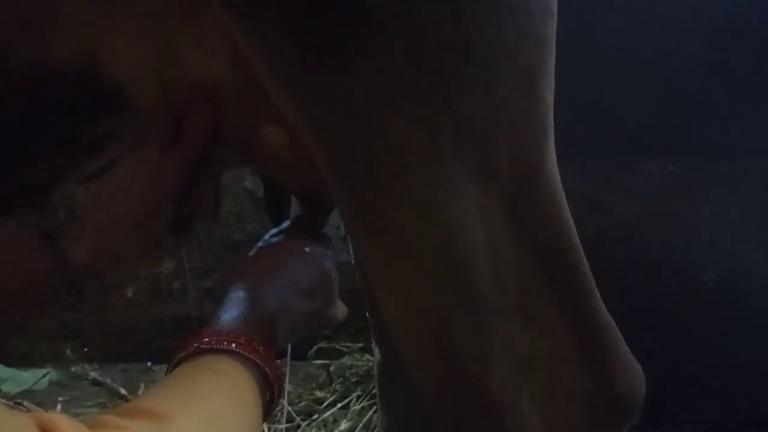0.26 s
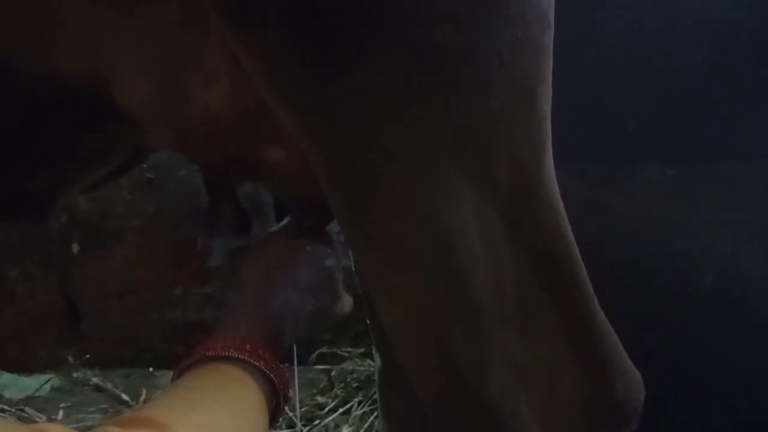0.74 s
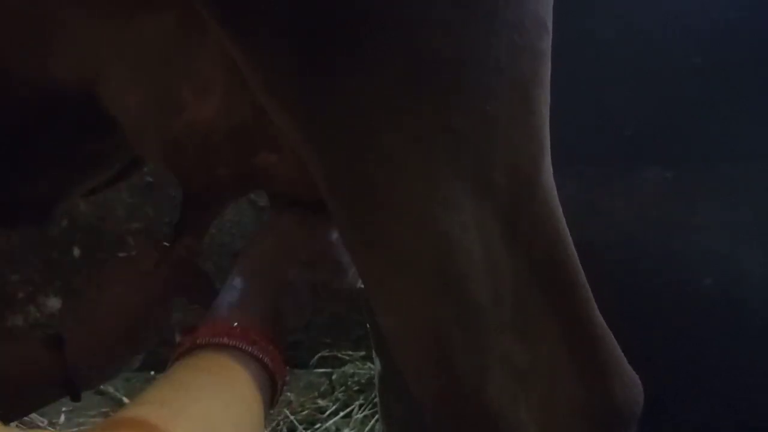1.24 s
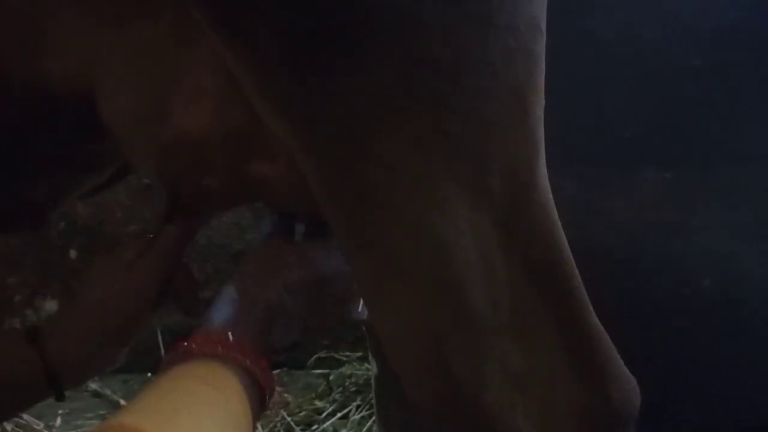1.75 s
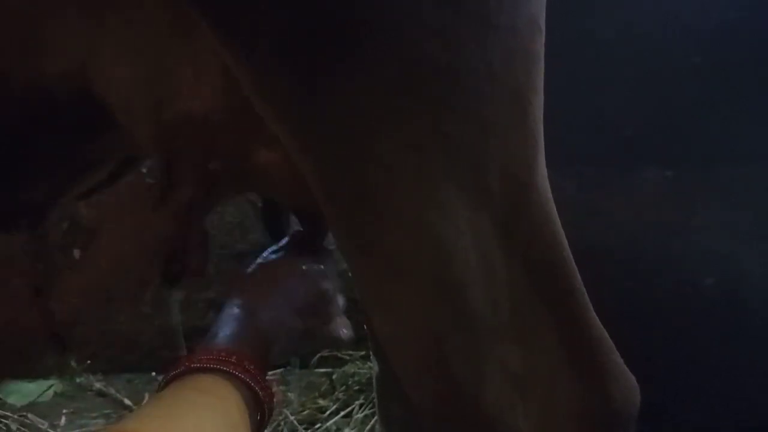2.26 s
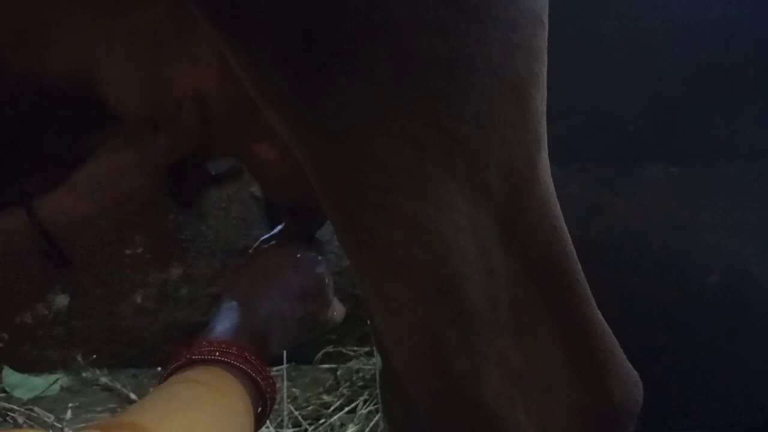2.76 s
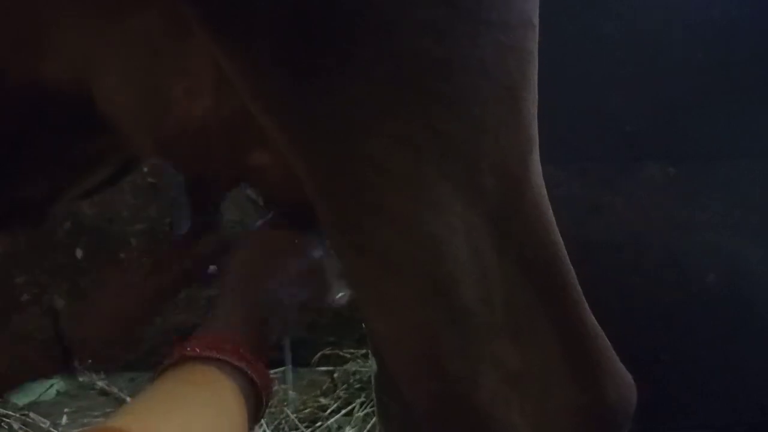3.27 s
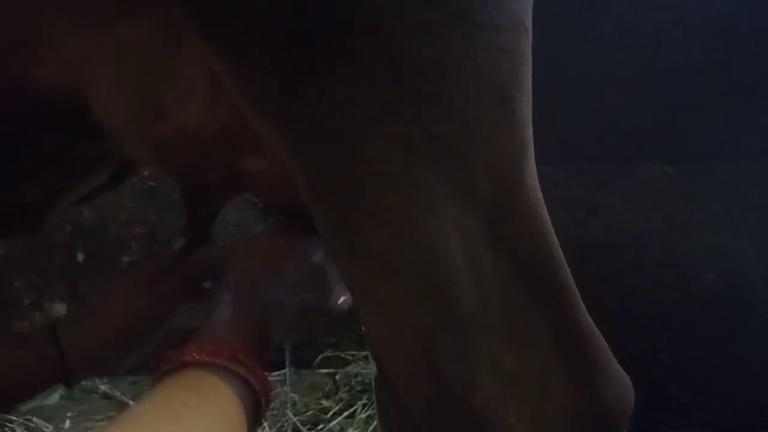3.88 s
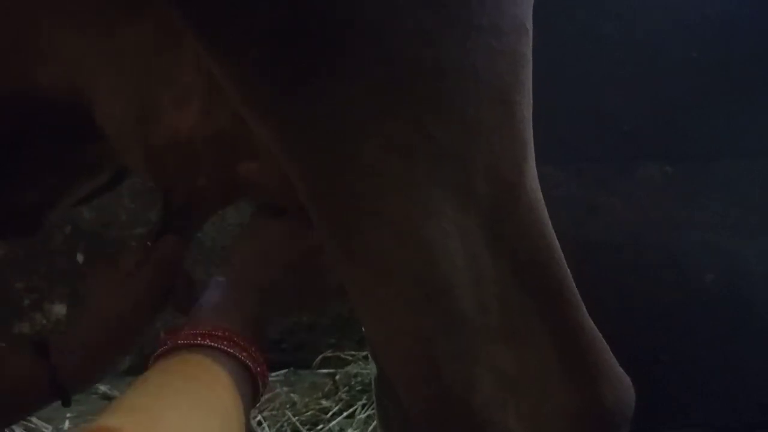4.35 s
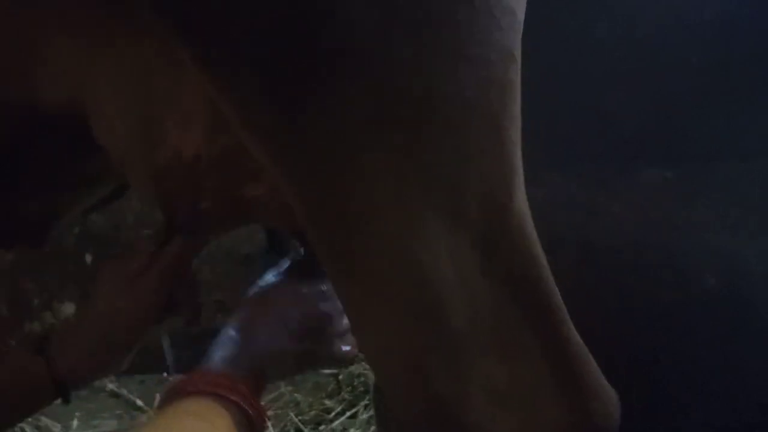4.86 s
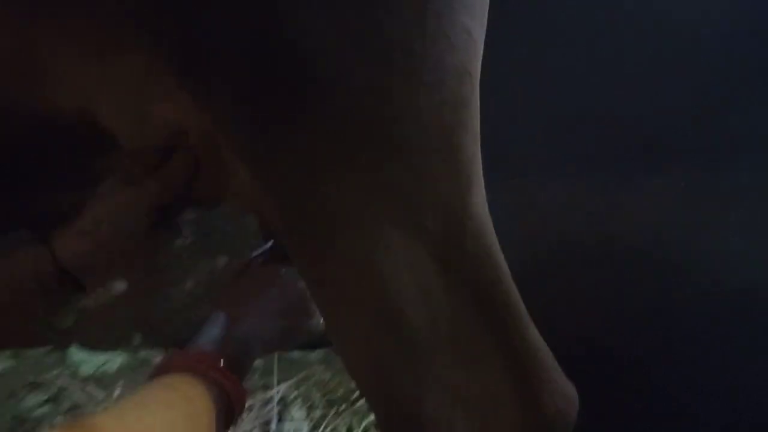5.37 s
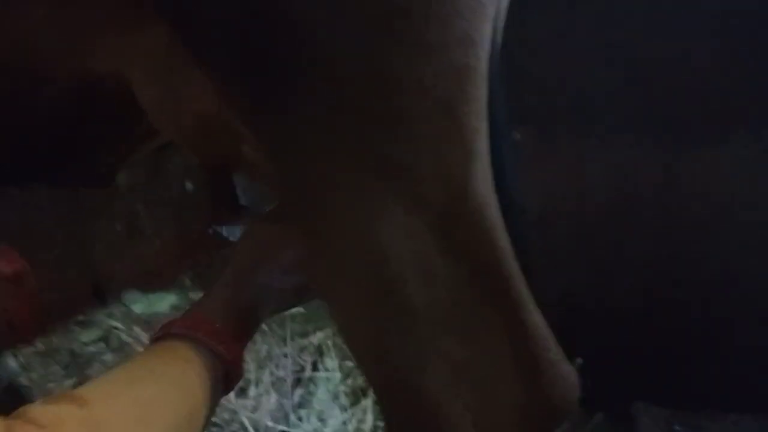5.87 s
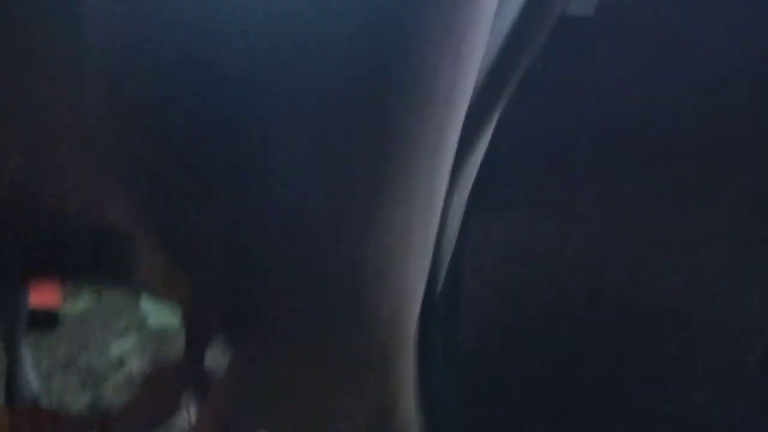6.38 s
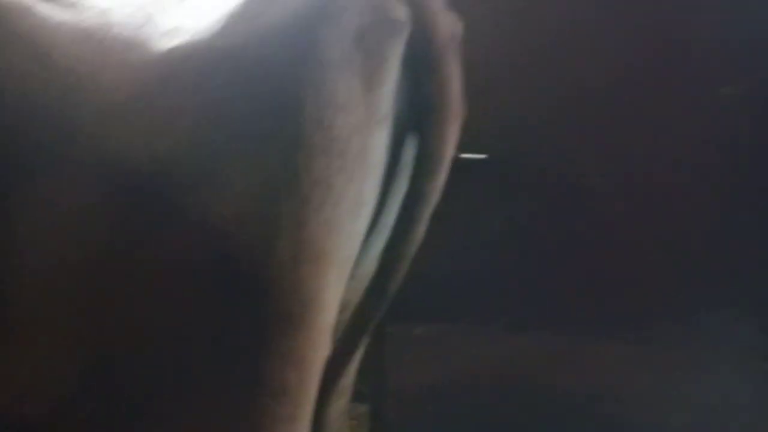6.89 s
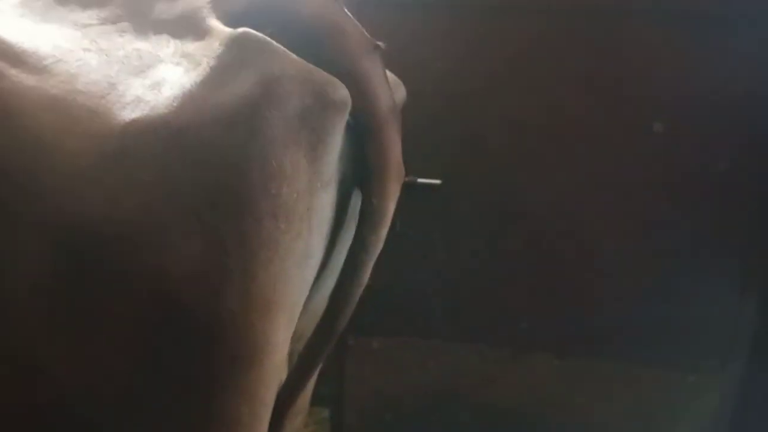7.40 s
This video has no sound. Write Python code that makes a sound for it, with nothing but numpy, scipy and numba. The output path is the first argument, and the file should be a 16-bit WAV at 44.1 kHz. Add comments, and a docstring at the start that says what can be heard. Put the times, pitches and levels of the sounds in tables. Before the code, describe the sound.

A cow is milked by hand, with rhythmic, fizzy squirts of milk ringing in a foamy metal pail in a quiet barn.

```python
"""Rhythmic, fizzy squirts ring in a metal pail: a cow milked by hand, strong and weak teat in turn.
Each jet drives bubbles into the foam, which ring the pail wall; brief notes sing as it hits the pail.
Spray and foam hiss and crackle on top, stray drops splat, and the air in the pail hums.
Underneath, a soft rumble comes and goes in a quiet barn. Heard close up, in mono."""
import sys
import numpy as np
from scipy import signal
from scipy.fft import rfft, irfft, next_fast_len
from scipy.io import wavfile
from scipy.ndimage import uniform_filter1d
from numba import njit

SR = 44100
rng = np.random.default_rng(int(sys.argv[2]) if len(sys.argv) > 2 else 0)


def materialize(psi):
    """Save the field psi as 16-bit PCM at rate SR to the path in sys.argv[1].

    A 1-D psi becomes a single channel; in a 2-D psi each row is a channel.
    """
    bounded = np.clip(np.atleast_2d(psi).T, -1, 1)
    quanta = np.round(bounded * 32767).astype(np.int16)
    wavfile.write(sys.argv[1], SR, quanta)


N = 336463

# Tone of the bubbles, by size: f/Hz, relative level/dB
BIG_BUBBLES = [(800, -2), (930, 0.5), (1050, 1), (1250, -2), (1500, 0), (1950, -37), (3300, -90)]
MIDDLE_BUBBLES = [(1200, -10), (1400, 0), (1600, -9.5), (1750, -14.5), (1950, -8.5), (2200, -25),
                  (3000, -80)]
SMALL_BUBBLES = [(1600, -14), (1950, 1), (2300, -1), (2800, -1), (3500, -1), (4600, 2), (6000, -7),
                 (9000, -80)]
TINY_BUBBLES = [(3600, -13), (4300, 0), (6400, 4), (8000, -2.5), (9500, -13), (12500, -17), (15000, -60)]
# Tone of the spray, the foam's fizz and its airy top: f/Hz, relative level/dB
SPRAY_EQ = [(300, -97), (2200, -5.5), (3800, -3.5), (5360, -5.5), (6460, -3.5), (7000, -8), (8200, -43),
            (11000, -39)]
FIZZ_EQ = [(1500, -71), (5000, -2.5), (7500, 0.5), (8100, -1.5), (9500, 2.5), (11500, -5), (13400, -11),
           (15500, -12)]
SHIMMER_EQ = [(9000, -70), (13600, -24), (14100, -12), (14650, 0), (15750, 0)]
# One squirt a row: t/s, attack/s, length/s, pressure sag/(dB/s), small bubbles/dB, their pitch/Hz,
# middle bubbles/dB, big bubbles/dB, their pitch/Hz, its slide/(octaves/s),
# spray/dB, fizz/dB, shimmer/dB, gurgle/dB, boom/dB
SQUIRTS = [(-0.078, 0.041, 0.12, -1.5, -30.5, 2620, -43, -35.5, 1004, 0.62, -36, -36.5, -34, -47.5, -40.5),
           (0.21, 0.11, 0.26, 15, -37.5, 2930, -46, -48.5, 1110, -0.18, -34, -37, -43, -47.5, -63),
           (0.506, 0.082, 0.2, 13.5, -28, 2540, -35.5, -36.5, 1130, -1.25, -30.5, -34.5, -35, -48, -43),
           (0.852, 0.078, 0.19, 14, -32.5, 2700, -39, -47.5, 1150, -0.72, -37.5, -39.5, -41, -51.5, -48.5),
           (1.153, 0.034, 0.19, -4.5, -33.5, 2930, -47.5, -38, 1144, -0.71, -35, -41, -35, -46.5, -43.5),
           (1.515, 0.07, 0.15, 19, -30.5, 2600, -38.5, -41, 1130, 0.49, -41, -38, -47, -48.5, -47.5),
           (1.798, 0.068, 0.24, 17.5, -25.5, 2730, -34, -33, 1226, -1.63, -33, -36.5, -33, -40, -38),
           (2.133, 0.1, 0.14, 13, -30.5, 2670, -37.5, -40, 1075, -1.2, -33.5, -36, -37, -51, -48),
           (2.443, 0.066, 0.18, 13.5, -27.5, 2900, -35.5, -35.5, 1160, -1.5, -33, -35, -33, -48, -44.5),
           (2.8, 0.037, 0.2, 23, -34.5, 2480, -39, -45.5, 1160, -0.029, -35.5, -42.5, -40, -45.5, -48),
           (3.102, 0.073, 0.22, 17.5, -25.5, 2750, -38, -31.5, 1175, -1.1, -33.5, -35, -38, -42, -40),
           (3.477, 0.046, 0.13, 23, -32.5, 2600, -40, -45.5, 1006, 1.1, -36, -44, -40, -50, -56),
           (3.728, 0.11, 0.2, 25.5, -24.5, 2440, -31.5, -34.5, 1040, -0.22, -30, -30, -33, -38.5, -41.5),
           (4.084, 0.093, 0.11, 15, -30.5, 2550, -36.5, -45, 1170, -1.1, -34.5, -36, -36, -49.5, -61),
           (4.352, 0.055, 0.22, 17.5, -26.5, 2810, -30, -37, 1080, 0.16, -33, -37, -37, -45, -44),
           (4.715, 0.055, 0.12, 9, -35.5, 2410, -38.5, -42, 1020, 1.6, -35, -39, -39, -49, -43.5),
           (4.999, 0.15, 0.21, 24.5, -25, 2560, -31.5, -34.5, 960, 2.1, -30.5, -29.5, -32, -38, -39),
           (5.317, 0.23, 0.17, 23.5, -27.5, 2580, -35.5, -39, 990, 1, -29.5, -27.5, -30, -43, -45),
           (5.647, 0.16, 0.23, 32.5, -21, 2320, -31, -32, 1130, -1.9, -29.5, -24.5, -34, -38.5, -39),
           (5.978, 0.16, 0.24, 34.5, -28, 2980, -35.5, -46.5, 910, 1.06, -32.5, -29, -39, -42.5, -47),
           (6.314, 0.081, 0.17, 23, -27.5, 2950, -33.5, -34.5, 1070, -0.45, -32, -34, -35, -43, -42),
           (6.651, 0.063, 0.19, 40, -32, 2700, -40, -46, 1090, -0.096, -35, -37, -45, -49, -53),
           (6.955, 0.04, 0.15, 3, -35, 2880, -39, -37.5, 960, 0.28, -36, -39.5, -38, -47, -40.5),
           (7.275, 0.074, 0.18, 14.5, -36, 2800, -44.5, -46.5, 1090, -0.11, -41.5, -44, -54, -54, -50),
           (7.576, 0.044, 0.15, 78, -28, 3030, -36, -33.5, 1290, -1.2, -36, -40, -49, -45, -41)]
def jet():
    """Each squirt stirs up bubbles of four sizes, spray and fizzing foam."""
    small_db, small_hz, middle_db, big_db, big_hz, big_slide = np.transpose(SQUIRTS)[4:10]
    spray_db, fizz_db, shimmer_db = np.transpose(SQUIRTS)[10:13]
    big = bubbles(BIG_BUBBLES, pitch_slide(big_hz, big_slide), count=11000, cycles=75, scatter_db=0,
                  glide=0.051, focus_db=6, focus_octaves=0.052, wall_db=1)
    middle = bubbles(MIDDLE_BUBBLES, np.full(N, 1640.), count=10000, cycles=36, scatter_db=-0.5,
                     glide=0.03, focus_db=4.5, focus_octaves=0.078, wall_db=-3)
    small = bubbles(SMALL_BUBBLES, pitch_slide(small_hz, octaves_per_s=0.17), count=32000, cycles=46,
                    scatter_db=-0.9, glide=0.049, focus_db=5.5, focus_octaves=0.55, wall_db=2.5)
    tiny = bubbles(TINY_BUBBLES, np.full(N, 6300.), count=9000, cycles=99, scatter_db=3,
                   glide=0.06, focus_db=1, focus_octaves=0.24, wall_db=-53)
    spray = crackle(SPRAY_EQ, pop_share=0.058, scatter_db=4.5, flicker_db=0.5, band_flicker_db=2.5)
    spray = unit(spray + undb(-9.5) * tiny)
    fizz = crackle(FIZZ_EQ, pop_share=0.19, scatter_db=2, flicker_db=1, band_flicker_db=2)
    shimmer = crackle(SHIMMER_EQ, pop_share=0.18, scatter_db=13, flicker_db=-1.5, band_flicker_db=1.5)
    body = (envelope(small_db, "small") * small + envelope(middle_db, "middle") * middle
            + envelope(big_db, "big") * big + envelope(spray_db, "spray") * spray)
    sizzle = undb(0.9 * wander(26))
    foam = envelope(fizz_db, "fizz") * fizz + envelope(shimmer_db, "shimmer") * shimmer
    return body + sizzle * foam


# Layer names, one for each row of LAYER_SHAPES
LAYERS = ["small", "middle", "big", "spray", "fizz", "shimmer", "gurgle", "boom"]
# How a layer rides a squirt: attack factor, sag factor, extra hold/s, release/(dB/s), floor/dB, sputter/dB
LAYER_SHAPES = [(1.84, 1.33, 0.011, 79, -53.5, 0.4), (1.22, 1.24, 0.0024, 62, -75, 1.2),
                (1.36, 0.28, 0.03, 73, -82, 0.79), (1.33, 1.03, -0.035, 21.3, -65, 0.29),
                (3.2, 1.35, -0.042, 39, -47.5, 0.12), (1.9, 0.66, -0.039, 21, -45.5, 0.6),
                (2.26, 0.8, 0.03, 45, -68, 0.87), (0.36, 0.0, 0.084, 200, -53.5, 2.5)]
def envelope(levels_db, layer):
    """A layer's sputtering gain: every squirt swells, sags with the pressure and fades to a floor."""
    attack_factor, sag_factor, hold_s, release, floor_db, sputter_db = LAYER_SHAPES[LAYERS.index(layer)]
    power = np.full(N, undb(floor_db) ** 2)
    for (start, attack_s, length, sag, *_), db in zip(SQUIRTS, levels_db):
        i = max(int(start * SR), 0)
        age = np.arange(i, min(i + SR, N)) / SR - start
        attack = np.clip(age / max(attack_s * attack_factor, .005), 0, 1)
        swell = np.sin(np.pi / 2 * attack) ** 0.94
        fall_db = sag_factor * sag * age + release * np.maximum(age - length - hold_s, 0)
        power[i:i + len(age)] += (swell * undb(db - fall_db)) ** 2
    return np.sqrt(power) * undb(sputter_db * wander(12))


def pitch_slide(hz, octaves_per_s):
    """The favoured bubble pitch: set by the latest squirt, sliding while it runs."""
    t = np.arange(N) / SR
    start, _, length = np.transpose(SQUIRTS)[:3]
    latest = np.maximum(np.searchsorted(start, t) - 1, 0)
    slide = np.broadcast_to(octaves_per_s, hz.shape)[latest]
    return hz[latest] * 2 ** (slide * np.minimum(t - start[latest], length[latest]))


# Resonances of the pail wall: f/Hz, width/Hz, relative level/dB
WALL_MODES = [(646.6, 6.2, 18), (680, 6.8, 16), (776, 30, 20), (857, 16, 17), (911, 9.6, 13),
              (981, 25, 15.5), (1049, 32, 13), (1149, 28, 16), (1217, 18, 5.5), (1525, 21, 9.5),
              (1597, 50, 9), (1684, 37, 13), (2067, 37, 0.5), (2303, 48, -0.5), (2646, 24, 1.5),
              (3150, 7.8, -5)]
def bubbles(eq, focus_hz, count, cycles, scatter_db, glide, focus_db, focus_octaves, wall_db):
    """Bubbles of random size ping, boosted near focus_hz; the pail wall rings along."""
    when, pitch, odds, life, sign = rng.random((count, 5)).T
    start = (when * N).astype(np.int64)
    low_hz, high_hz = eq[0][0], eq[-2][0]
    hz = low_hz * (high_hz / low_hz) ** pitch
    boost_db = focus_db * np.exp(-(np.log2(hz / focus_hz[start]) / focus_octaves) ** 2)
    db = eq_db(eq, hz) + boost_db + scatter(odds, scatter_db, cap_db=11)
    # The factor hz makes up for high bubbles being shorter and fewer per Hz.
    amplitude = undb(db) * hz * np.sign(sign - .5)
    pings = rising_pings(start, hz / SR, cycles * (.5 + life), amplitude, glide, N)
    # A high-pass clears the low thump below the bubbles' pitch range.
    pings = signal.sosfilt(signal.butter(6, 1.1 * low_hz, "high", fs=SR, output="sos"), pings)
    wall = unit(resonate(pings, WALL_MODES))
    return unit(unit(pings) + undb(wall_db) * wall)


@njit
def rising_pings(start, cycles_per_sample, cycles, amplitude, glide, length):
    """Damped sines, each fading 60 dB over its cycles while its pitch climbs by the fraction glide."""
    out = np.zeros(length)
    for k in range(len(start)):
        steps = cycles[k] / cycles_per_sample[k]
        turn = np.exp(2j * np.pi * cycles_per_sample[k] - np.log(1000) / steps)
        climb = np.exp(2j * np.pi * cycles_per_sample[k] * glide / steps)
        phasor = amplitude[k] + 0j
        for i in range(start[k], min(start[k] + int(steps), length)):
            out[i] += phasor.imag
            phasor *= turn
            turn *= climb
    return out


def crackle(eq, pop_share, scatter_db, flicker_db, band_flicker_db, pops_per_s=1500):
    """Flickering hiss peppered with tiny uneven pops."""
    hiss, odds = rng.standard_normal(N), rng.random(N)
    kicks = rng.standard_normal(N) * (rng.random(N) < pops_per_s / SR)
    pops = unit(kicks * undb(scatter(odds, scatter_db, cap_db=14)))
    texture = treble_flicker(blend(hiss, pops, pop_share), band_flicker_db)
    return unit(equalise(texture, eq) * undb(flicker_db * wander(40)))


def treble_flicker(x, depth_db):
    """Narrow bands of the hiss swell and sink at random for some 30 ms."""
    bands = signal.stft(x, nperseg=1024, noverlap=768)[2]
    swells = uniform_filter1d(rng.standard_normal(bands.shape), size=4, axis=0)
    swells = unit(uniform_filter1d(swells, size=5, axis=1))
    return unit(signal.istft(bands * undb(depth_db * swells), nperseg=1024, noverlap=768)[1][:N])


# Tone of the largest bubbles: f/Hz, relative level/dB
DEEP_BUBBLES = [(430, -5.5), (600, -6.5), (800, -4), (950, -28), (1500, -70)]
def gurgle():
    """The largest bubbles come when the jet goes deep, and linger."""
    deep = bubbles(DEEP_BUBBLES, np.full(N, 790.), count=4000, cycles=48, scatter_db=1,
                   glide=0.096, focus_db=0, focus_octaves=0.11, wall_db=-2.5)
    return envelope(np.transpose(SQUIRTS)[-2], "gurgle") * deep


def pail_tail(x, t60_s=0.21, wet_db=-8.5):
    """Dense rings of the metal add a short tail; each squirt lands elsewhere and wakes other rings."""
    t = np.arange(SR // 3) / SR
    wet = np.zeros(N + len(t))
    cuts = [0, *(int(start * SR) for start, *_ in SQUIRTS[1:]), N]
    for a, b in zip(cuts, cuts[1:]):
        tail = rng.standard_normal(len(t)) * undb(-60 * t / t60_s)
        wet[a:b + len(t) - 1] += signal.fftconvolve(x[a:b], tail / np.linalg.norm(tail))
    return (x + undb(wet_db) * wet[:N]) / np.sqrt(1 + undb(wet_db) ** 2)


# Brief ringing notes: loudest t/s, length/s, level/dB, f/Hz, waver/Hz
RINGS = [(0.057, 0.061, -36, 1105, 35.0), (0.153, 0.11, -47, 1060, 35), (0.552, 0.064, -31, 1950, 59.3),
         (0.587, 0.065, -28.5, 2366, 35.0), (0.583, 0.092, -33, 4330, 35.0), (0.65, 0.08, -34, 2720, 60.7),
         (0.668, 0.04, -35, 1034, 35.0), (0.92, 0.077, -51, 1630, 35), (0.93, 0.1, -43, 2620, 250),
         (1.199, 0.055, -37.5, 1695, 35.0), (1.202, 0.12, -40, 1124, 35.0), (1.276, 0.055, -35, 1180, 35.0),
         (1.334, 0.06, -39, 1076, 35), (1.586, 0.09, -41, 2390, 247), (1.85, 0.071, -35, 2193, 35.0),
         (1.87, 0.065, -38, 3360, 35.0), (1.921, 0.12, -33.0, 1205.0, 34.8), (1.975, 0.055, -34, 975, 35.0),
         (2.473, 0.035, -34, 1535, 35), (2.499, 0.086, -33, 1157, 34.7), (2.496, 0.077, -31.5, 1743, 35.0),
         (2.521, 0.042, -31.5, 3070, 34.7), (2.549, 0.07, -30.5, 3450, 35.0), (2.63, 0.13, -37, 1050, 35.0),
         (2.854, 0.071, -39, 2304.0, 35.3), (2.89, 0.091, -41, 2075, 250), (3.138, 0.04, -37, 1554, 35),
         (3.168, 0.065, -33.5, 1643, 35.0), (3.196, 0.085, -38.0, 3450, 35.0),
         (3.201, 0.067, -39, 1166, 35.0), (3.264, 0.06, -36, 2670, 35), (3.317, 0.079, -35.5, 3600, 35.0),
         (3.316, 0.042, -30, 991, 35.0), (3.537, 0.055, -39, 2583.0, 34.6),
         (3.793, 0.046, -31.5, 2285, 35.0), (3.808, 0.076, -31, 1604, 35.2),
         (3.862, 0.041, -38, 2600, 35.0), (3.895, 0.055, -36, 1034, 35.0), (4.18, 0.065, -38, 2640, 35.0),
         (4.178, 0.049, -42, 1701.0, 35.0), (4.197, 0.09, -49, 2310, 35), (4.405, 0.054, -29, 1614.0, 34.5),
         (4.411, 0.064, -33.5, 1060, 35.0), (4.447, 0.06, -35, 2630, 35.0), (4.47, 0.13, -35.5, 3640, 35.0),
         (4.498, 0.093, -35, 1052, 35), (4.588, 0.1, -36, 1063, 34.8), (4.819, 0.09, -42, 2310, 35),
         (4.842, 0.1, -45, 2080, 35), (5.062, 0.055, -36.5, 998, 34.8), (5.088, 0.06, -29.5, 2340, 35.0),
         (5.093, 0.055, -33, 1701.0, 35.0), (5.23, 0.11, -32.5, 1162.0, 35.0),
         (5.414, 0.099, -38.5, 2420, 250), (5.484, 0.1, -39, 1686, 35.2), (5.703, 0.08, -43, 1070, 35),
         (5.749, 0.06, -31.5, 2064, 35.0), (5.838, 0.17, -34, 935, 35.0), (6.02, 0.095, -41, 941, 34.6),
         (6.14, 0.11, -37.5, 3900.0, 450.0), (6.39, 0.097, -41, 1075, 35.0),
         (6.395, 0.12, -33.5, 1750, 34.7), (6.487, 0.075, -36.5, 1034, 35.0), (6.602, 0.078, -52, 1700, 35),
         (6.726, 0.09, -44, 2700, 248), (7.007, 0.06, -40, 1042, 35.0), (7.013, 0.07, -41, 1560, 35.0),
         (7.152, 0.089, -45, 904, 35), (7.607, 0.045, -36, 1650, 35.0)]
def rings():
    """Brief wavering notes swell and fade as the jet hits the pail."""
    out = np.zeros(N)
    t = np.arange(SR // 2) / SR - .25
    for peak_s, length, db, hz, waver_hz in RINGS:
        span = int(SR / (3.58 * waver_hz))  # wider wavers move faster
        waver = unit(smooth(rng.standard_normal(len(t)), span))
        note = tone(hz + waver_hz * waver)
        noise = noise_band(len(t), hz, 0.073 * hz + waver_hz)
        noise_share = min(0.38 * (hz / 1500) ** 0.75, 1)  # high notes are noisier
        swell = np.exp(-(t / (np.where(t < 0, 0.35, 0.55) * length)) ** 2)
        ring = undb(db) * swell * blend(note, noise, noise_share)
        at = int(peak_s * SR) + np.arange(len(t)) - len(t) // 2
        inside = (at >= 0) & (at < N)
        out[at[inside]] += ring[inside]
    return out


# Splashes at the front of a jet: t/s, level/dB, centre f/Hz
LANDINGS = [(0.53, -31, 2000), (0.886, -38, 1900), (1.164, -32, 2600), (1.819, -33, 1900),
            (2.458, -32, 1800), (2.822, -37, 2200), (3.116, -39, 1800), (3.772, -32, 2000),
            (4.369, -39, 2000), (5.008, -33, 3520), (6.333, -37, 2200), (6.679, -35, 2600),
            (6.962, -33.5, 2480)]
def landings(attack_s=0.0034, t60_s=0.17):
    """The front of a jet hits the foam with a sharp, broad splash."""
    out = np.zeros(N)
    t = np.arange(SR // 4) / SR
    for start, db, hz in LANDINGS:
        i = int(start * SR)
        gain = undb(db - 60 * t / t60_s) * (1 - np.exp(-t / attack_s))
        out[i:i + len(t)] += gain * noise_band(len(t), hz, 1.5 * hz)
    return out


# Stray drops: t/s, level/dB, f/Hz, spray t60/s
DROPS = [(0.2804, -21, 4930, 0.015), (0.9767, -29, 10500, 0.025), (1.0794, -26, 9830, 0.03),
         (1.161, -24, 5000, 0.04), (1.615, -24, 5630, 0.03), (1.8, -22.5, 6350, 0.039),
         (2.39, -28, 9000, 0.025), (2.4508, -20, 4970, 0.04), (3.021, -23, 4740, 0.023),
         (3.1053, -25, 5260, 0.036), (3.453, -21, 5950, 0.023), (3.7286, -28, 6600, 0.026),
         (3.8272, -20, 6460, 0.03), (4.2502, -29, 9900, 0.025), (4.3974, -25, 7200, 0.025),
         (4.792, -20, 5700, 0.025), (4.931, -21, 4760, 0.029), (5.009, -25, 4700, 0.088),
         (5.238, -32, 13500, 0.025), (5.3637, -27, 9790, 0.03), (5.511, -21, 6500, 0.027),
         (5.596, -23, 4500, 0.02), (5.658, -18, 6250, 0.13), (6.0576, -25, 6400, 0.033),
         (6.0761, -28, 9500, 0.02), (6.105, -22, 7500, 0.03), (6.2866, -32, 13500, 0.025),
         (6.32, -24, 6500, 0.08), (6.537, -22, 5200, 0.058), (6.6564, -24, 6600, 0.033),
         (6.8179, -26, 6500, 0.024), (6.962, -22, 5900, 0.092), (7.0379, -28, 8600, 0.02),
         (7.0758, -18, 6400, 0.03), (7.2928, -28, 9200, 0.02), (7.3287, -26, 9200, 0.03),
         (7.565, -44, 5920, 0.027)]
def splats(ping_decay_s=0.0029):
    """A drop strikes the foam or the wall: a bright ping and a burst of spray."""
    out = np.zeros(N)
    for start, db, hz, t60_s in DROPS:
        i = int(start * SR)
        t = np.arange(min(SR // 10, N - i)) / SR
        spray = resonate(rng.standard_normal(SR // 10), [(hz, hz / 1.2, 0)])[:len(t)]
        ping = np.sin(2 * np.pi * hz * t) * np.exp(-t / ping_decay_s)
        out[i:i + len(t)] += undb(db) * (0.4 * ping + 0.54 * spray * undb(-60 * t / t60_s))
    return out


# Tone of bursting foam: f/Hz, relative level/dB
TICK_EQ = [(2500, -30), (6000, -7), (9500, -4), (13000, -3.5), (15500, 3)]
def foam_ticks(per_s=32, decay_s=0.004, level_db=-51):
    """Single foam bubbles burst at random: short bright puffs of uneven size."""
    chance, odds, hiss = rng.random(N), rng.random(N), rng.standard_normal(N)
    kicks = (chance < per_s / SR) * undb(scatter(odds, 4, cap_db=12))
    puffs = signal.lfilter([1], [1, -np.exp(-1 / (decay_s * SR))], kicks)
    return undb(level_db) * equalise(hiss * puffs, TICK_EQ)


# The two notes of the air in the pail: f/Hz, width/Hz
AIR_MODES = [(330, 15.42), (358, 14.95)]
# Their fader moves: t/s, lower note/dB, upper note/dB
HUM_LEVELS = [(0.0, -47, -47), (0.04, -48, -51), (0.3, -57, -52), (0.36, -37, -52), (0.49, -50, -45),
              (0.53, -41.5, -47), (1.0, -57, -41), (1.1, -58, -52), (1.17, -39, -49), (1.36, -50, -58),
              (1.4, -52, -47), (1.51, -45, -42), (1.59, -59, -53), (1.66, -41, -47), (1.72, -51.5, -49),
              (1.89, -44, -55), (1.93, -39.5, -44), (2.02, -48, -41), (2.1, -45, -53), (2.19, -55, -41.5),
              (2.32, -42, -46), (2.36, -56, -49), (2.51, -49, -46), (2.66, -39.5, -56), (2.7, -50, -53),
              (2.83, -57, -65), (3.02, -41.5, -48), (3.21, -53, -59), (3.25, -39, -49), (3.55, -53, -47),
              (3.59, -55, -59), (3.78, -51, -39.5), (3.87, -42, -58), (3.91, -40, -43), (3.99, -55, -41),
              (4.1, -54, -56), (4.14, -52, -44.5), (4.33, -52, -57), (4.4, -49, -47), (4.69, -59, -51),
              (4.91, -35.5, -41), (4.95, -47, -48), (5.21, -44, -51), (5.27, -39, -47), (5.55, -44, -42.5),
              (5.59, -34, -38), (5.63, -45, -45), (5.84, -51, -40), (6.05, -58, -51), (6.25, -51, -45),
              (6.44, -58, -51), (6.93, -45, -57), (6.99, -32.5, -46), (7.12, -44, -49),
              (7.27, -43.5, -43.5), (7.63, -45.5, -57)]
def air_hum(breath_share=0.31):
    """The air in the pail hums on two close, breathy notes that swell on their own."""
    out = np.zeros(N)
    for (hz, width), db in zip(AIR_MODES, automation(HUM_LEVELS)):
        note = tone(hz + 0.397 * width * wander(25))
        out += undb(db) * blend(note, noise_band(N, hz, width), breath_share)
    return out


# Deep resonances of the pail: f/Hz, width/Hz, gain/dB
BOOM_MODES = [(194.7, 22, 3), (234, 21, 13), (284, 55, 17.5), (411.9, 7.8, 20)]
def pail_boom():
    """Each squirt wakes a faint, low boom in the pail."""
    gain = envelope(np.transpose(SQUIRTS)[-1], "boom")
    return gain * resonate(rng.standard_normal(N), BOOM_MODES, passes=2)


# Fader moves of the rumble: t/s, level/dB
RUMBLE_LEVELS = [(0.0, -61), (0.02, -66), (0.55, -72), (1.72, -70), (1.93, -49), (2.51, -65), (3.59, -79),
                 (3.72, -65), (3.99, -87), (4.38, -56), (5.06, -65.5), (5.31, -55), (5.82, -68),
                 (6.01, -52), (6.33, -68), (7.03, -70), (7.18, -52.5), (7.63, -57)]
# Tone of the rumble: f/Hz, relative level/dB
RUMBLE_EQ = [(20, -18), (48, -26), (66, -3.5), (82, -2), (98, -1.5), (125, -4.5), (200, -2), (300, -22)]
def rumble():
    """Soft low noise that comes and goes."""
    db = automation(RUMBLE_LEVELS)[0] + 0.5 * wander(3.9)
    return undb(db) * equalise(rng.standard_normal(N), RUMBLE_EQ)


# Room tone of the barn: f/Hz, relative level/dB
BARN_EQ = [(20, -41), (50, -25), (66, -21.5), (120, -25), (200, -24.5), (343, 7), (480, -16), (750, -20.5),
           (1000, -9), (1700, -11), (6450, -17), (10400, -43)]
def barn(level_db=-48):
    """A quiet, steady bed of noise."""
    return undb(level_db) * equalise(rng.standard_normal(N), BARN_EQ)


def undb(db):
    """dB to gain."""
    return 10 ** (np.asarray(db) / 20)


def unit(x):
    """Scaled to rms 1."""
    return x / np.sqrt(np.mean(x ** 2))


def blend(a, b, share):
    """Equal-power mix with the given share of b."""
    return np.sqrt(1 - share) * a + np.sqrt(share) * b


def scatter(odds, scale_db, cap_db):
    """Uniform draws to level offsets in dB: mostly small, a few large."""
    return np.minimum(-scale_db * np.log(1 - odds), cap_db)


def automation(table):
    """Each fader lane of a table, one value a sample."""
    times, *lanes = np.transpose(table)
    return [np.interp(np.arange(N) / SR, times, lane) for lane in lanes]


def eq_db(eq, hz):
    """Level of an EQ curve at hz, on a log frequency axis."""
    f, db = np.transpose(eq)
    return np.interp(np.log(np.maximum(hz, 1.)), np.log(f), db)


def equalise(x, eq):
    """Sound shaped by an EQ curve, at rms 1."""
    size = next_fast_len(N)
    hz = np.arange(size // 2 + 1) * SR / size
    return unit(irfft(rfft(x, size) * undb(eq_db(eq, hz)), size)[:N])


def resonate(x, modes, passes=1):
    """Parallel resonances; more passes give steeper skirts."""
    out = 0
    for hz, width, db in modes:
        ring = x
        for _ in range(passes):
            ring = signal.lfilter(*signal.iirpeak(hz, hz / width, fs=SR), ring)
        out = out + undb(db) * ring
    return out


def noise_band(samples, hz, width):
    """Noise around hz, at rms 1."""
    return unit(resonate(rng.standard_normal(samples), [(hz, width, 0)], passes=2))


def tone(hz):
    """A sine along a pitch curve, at rms 1."""
    return np.sqrt(2) * np.sin(2 * np.pi * np.cumsum(hz) / SR)


def smooth(x, span):
    """Two moving averages of span samples."""
    return uniform_filter1d(uniform_filter1d(x, span), span)


def wander(per_s):
    """Smooth random modulation, at rms 1."""
    span = int(SR / per_s)
    steps = np.repeat(rng.standard_normal(N // span + 1), span)
    return unit(smooth(steps, span)[:N])


def scene():
    """Milk in the pail over the rumble and the barn, the same in both channels."""
    background = rumble() + barn()
    milk = pail_tail(jet() + gurgle()) + rings() + landings() + splats() + foam_ticks()
    return np.tile(milk + air_hum() + pail_boom() + background, (2, 1))


def record(dry):
    """The phone cuts the highest treble with a steep low-pass."""
    cutoff_hz = 15730
    return signal.sosfilt(signal.ellip(16, .3, 80, cutoff_hz, fs=SR, output="sos"), dry)


dry = scene()
out = record(dry)
materialize(out)
```